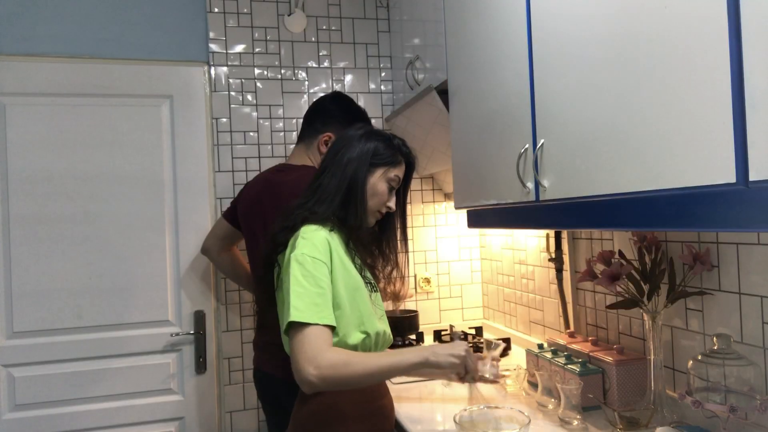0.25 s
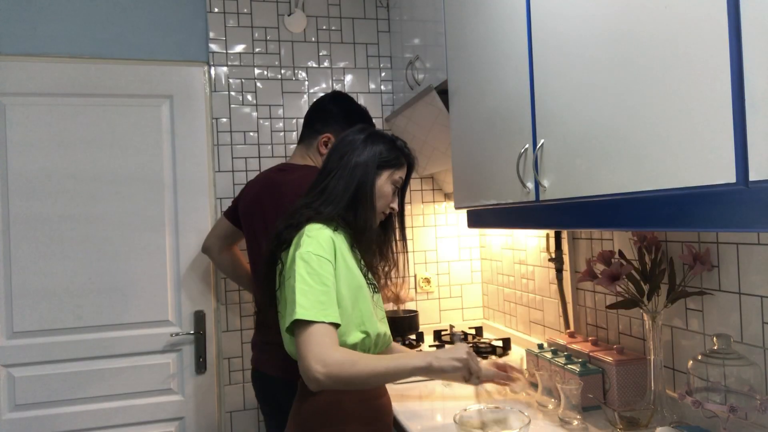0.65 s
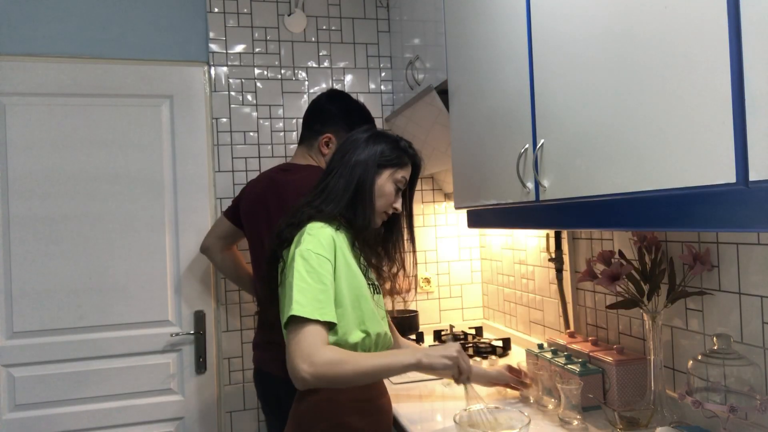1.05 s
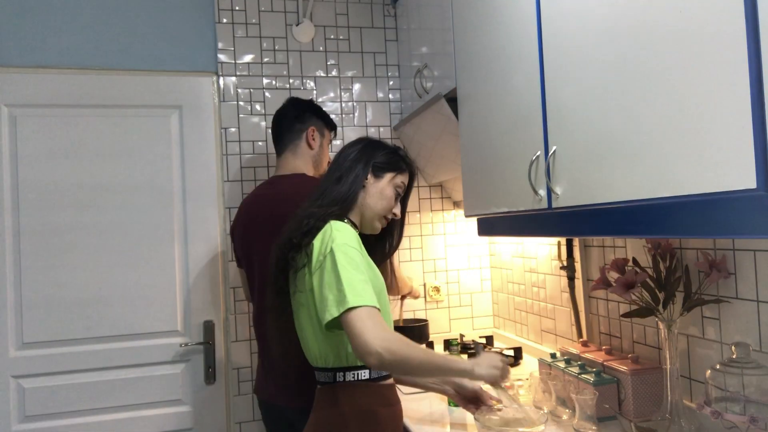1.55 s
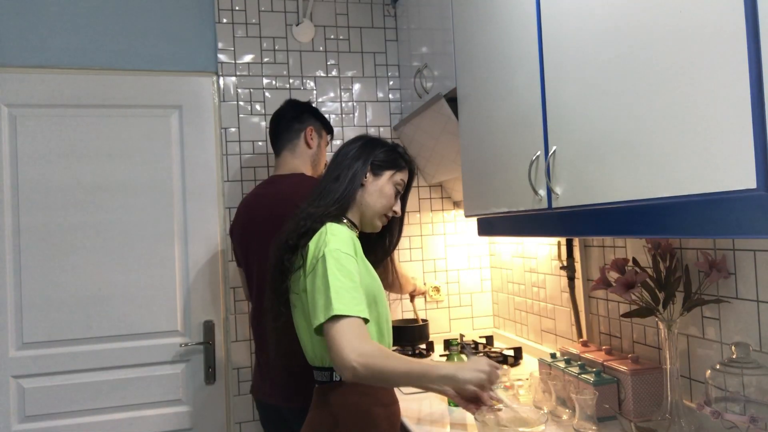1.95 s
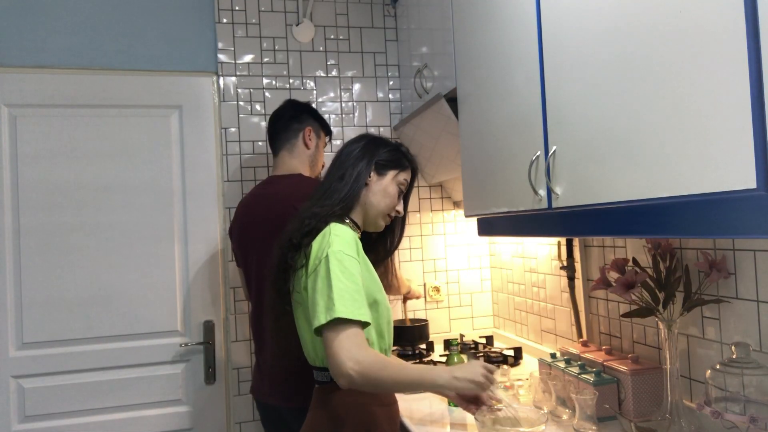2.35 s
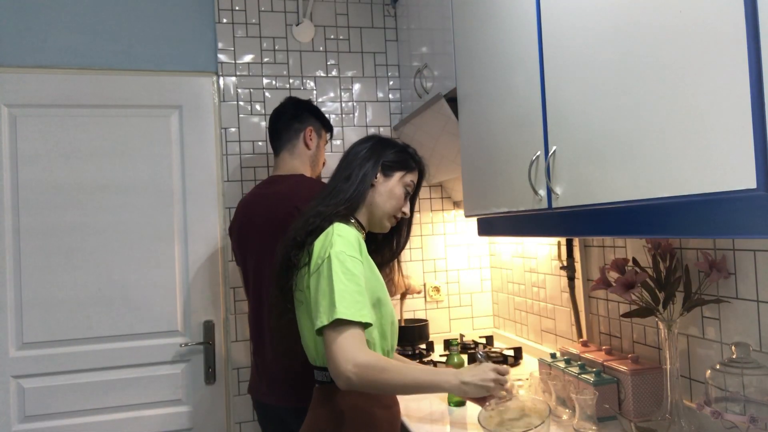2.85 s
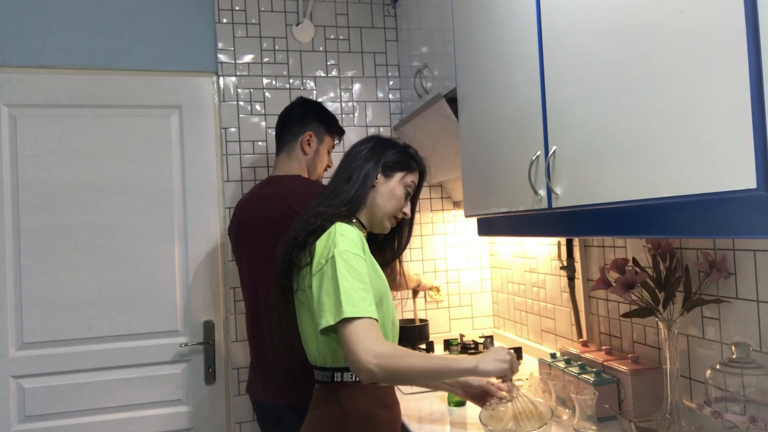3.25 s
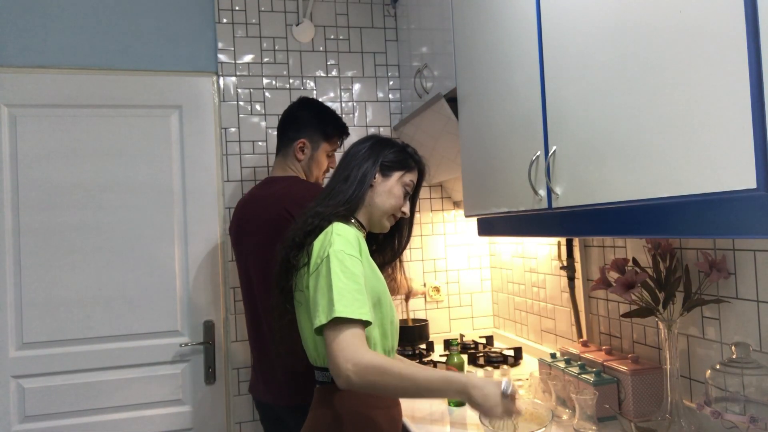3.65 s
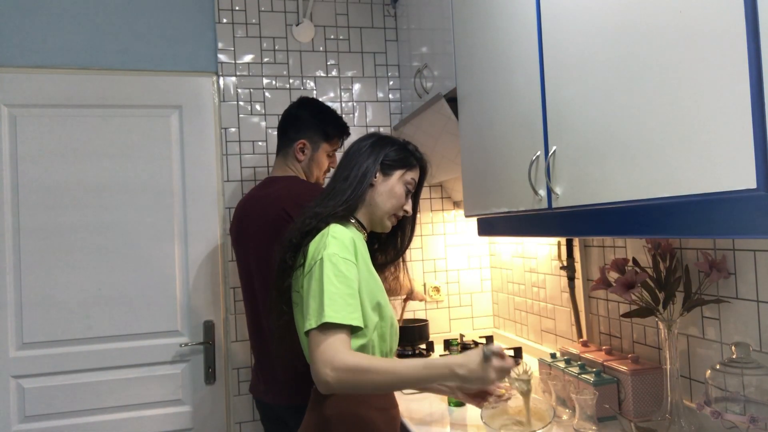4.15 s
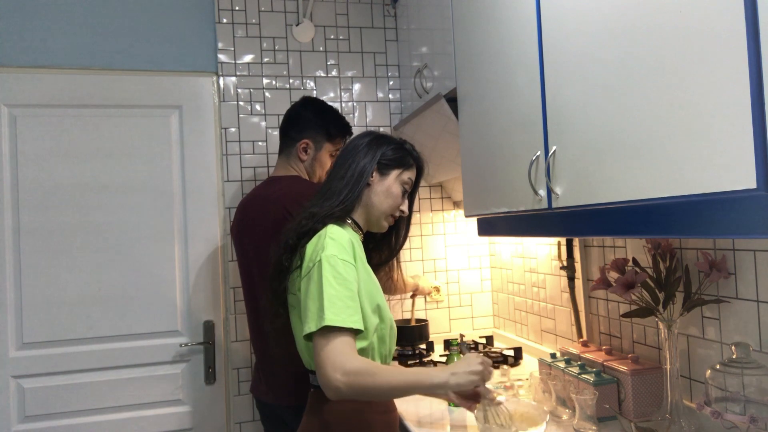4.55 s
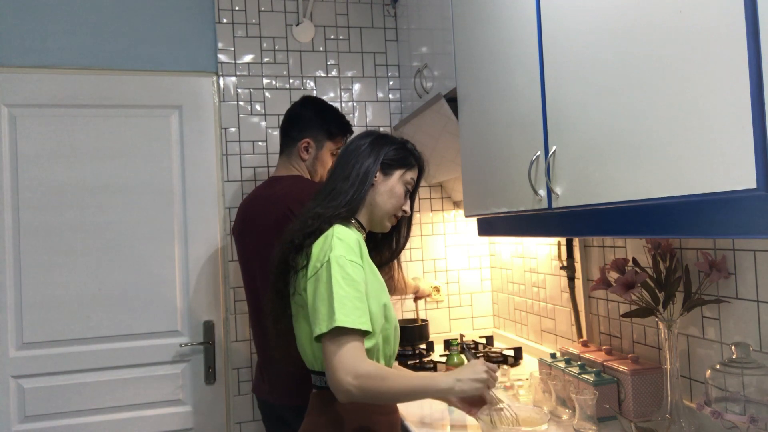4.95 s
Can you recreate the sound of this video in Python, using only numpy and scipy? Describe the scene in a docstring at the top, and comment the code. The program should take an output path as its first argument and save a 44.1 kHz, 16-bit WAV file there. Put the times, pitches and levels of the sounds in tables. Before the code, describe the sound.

A wire whisk clinks sharply on a glass bowl over thin hiss, then stirs softly over low hum before two loud bowl knocks.

```python
"""A wire whisk and a glass mixing bowl on the counter of a small tiled kitchen. Over a steady thin hiss
(coloured noise, narrow whistles) the whisk clinks hard, then lightly: noise cracks wake decaying modes. The
scene changes abruptly: now motor and mains hum sound with a rush of air. The whisk stirs softly: tiny random
slips drive resonances, among taps, scrapes, twangs and dull counter bumps. Two loud knocks of the bowl (thud,
clunk, ring) overload the microphone; a few faint touches follow."""
import sys
import numpy as np
from scipy import signal
from scipy.fft import rfft, irfft
from scipy.io import wavfile

SR = 44100
rng = np.random.default_rng(int(sys.argv[2]) if len(sys.argv) > 2 else 0)


def transcribe(signal):
    """Save signal, clipped to [-1, 1], as a 16-bit WAV file at the path in sys.argv[1]."""
    frames = np.atleast_2d(signal).T
    limited = np.clip(frames, -1, 1)
    pcm = np.round(limited * 32767).astype(np.int16)
    wavfile.write(sys.argv[1], SR, pcm)


N = 229356
TIME_S = np.arange(N) / SR
SECOND_S = TIME_S[:SR]   # time axis of every single event

# rel_db: level before the trims, filters and room of its source

# Room reverberation: pitch_hz, t60_s
ROOM_DECAY = [(100, 0.86), (350, 0.48), (1000, 0.31), (2500, 0.37), (5000, 0.31), (9000, 0.21),
              (16000, 0.27)]

# Broad hiss spectrum: pitch_hz, density_db_per_hz (relative)
HISS_SPECTRUM = [(25, -7), (60, 1), (150, -1.5), (400, -4), (750, -12), (1200, -1.5), (2200, -15.5),
                 (3000, -14), (4200, -7), (4850, -14.5), (7000, -17.5), (8200, -22), (10300, -22.5),
                 (12000, -15), (15500, -21.5)]
# Thin whistles in the hiss: pitch_hz, width_hz (of each of two stages), level_db_rms
HISS_WHISTLES = [(1094, 110, -64), (1187, 50, -64.5), (1260, 37, -65), (1420, 20, -64), (1530, 59, -64),
                 (1720, 38, -67.5), (3583, 59, -64), (3670, 39, -70), (4250, 190, -71), (5290, 114, -63.5),
                 (7020, 540, -69), (8600, 40, -84), (9460, 30, -77.5), (11650, 54, -74), (11440, 86, -68.5),
                 (11900, 100, -74), (15170, 380, -75)]
# Appliance air rush spectrum: pitch_hz, density_db_per_hz (relative)
AIR_SPECTRUM = [(15, -72), (25, -29), (97, -7.5), (149, -3.5), (354, -5), (659, -13), (962, -10),
                (1440, -13.5), (1700, -14.5), (2160, -25), (2690, -21.5), (5570, -24.5), (10700, -33.5),
                (12500, -29), (16000, -34)]
# Motor hum: multiple of turning rate, level_db_rms
MOTOR_HARMONICS = [(1, -61), (2, -53.5), (4, -70)]

# Dull bumps of the counter: start_s, rel_db, pitch_hz, t60_s
COUNTER_BUMPS = [(1.072, -33, 173, 0.061), (1.908, -35, 245, 0.063), (3.123, -32.5, 410, 0.075),
                 (3.13, -42, 190.5, 0.14), (3.149, -35.5, 52, .22), (4.619, -28, 42, 0.061)]

# Whisk strokes round the bowl: start_s, length_s, rub_rel_db, dry_hiss_rel_db
WHISK_STROKES = [(1.471, 0.11, -43.5, -60), (1.624, 0.041, -46.5, -69), (1.725, 0.11, -45.5, -64),
                 (1.898, 0.051, -49, -59), (2.12, 0.09, -44.5, -64), (2.228, 0.047, -45.5, -65),
                 (2.346, 0.072, -44, -70), (2.525, 0.031, -46.5, -68), (2.745, 0.043, -46, -68),
                 (3.2, 0.13, -48.5, -73), (3.353, 0.057, -50, -57), (3.513, 0.11, -45.5, -66),
                 (3.967, 0.17, -52, -81), (4.231, 0.073, -49, -72)]
# Wires tapping the glass: start_s, rel_db, corner_hz
WIRE_TAPS = [(1.738, -40, 2500), (1.909, -39.5, 2000), (2.53, -45, 3000), (2.708, -43.5, 3000),
             (3.121, -42, 1100), (4.046, -40, 4500), (5.155, -45.5, 3000)]
# Brief dry scrapes of the wires: start_s, rel_db, corner_hz
WIRE_SCRAPES = [(1.497, -43.5, 14000), (2.245, -48, 9000), (2.465, -52, 9000), (3.99, -48.5, 14000),
                (4.9, -47, 5000), (4.955, -44.5, 5990)]
# A single wire springing free: start_s, rel_db, corner_hz
WIRE_TWANGS = [(3.236, -40.5, 12000), (3.539, -43.5, 6000)]
# Modes of that wire: pitch_hz, rel_db, t60_s
WIRE_MODES = [(1670, -1, 0.11), (2347, 0, 0.13), (2400, -4, .15), (3930, 3, 0.069), (4310, 2, 0.082),
              (5680, 5, 0.062), (5760, -2, 0.076)]
# Spectrum of wires rubbing the bowl: pitch_hz, density_db_per_hz (relative)
RUB_SPECTRUM = [(150, -13), (300, -2), (450, -6), (640, -7.5), (920, -1), (1350, -6), (1750, -6.5),
                (2300, -12), (3700, -14), (4900, -23.5), (6000, -16), (10000, -29), (12500, -29),
                (16000, -36)]
# Resonances of rubbed bowl and wires: pitch_hz, width_hz, gain_db
RUB_RESONANCES = [(432, 72, 1), (871, 28, 2), (1002, 79, -3), (1688, 47, 0.5), (1910, 88, 0),
                  (2440, 63, -6.5), (2637, 80, 2.5), (3280, 62, -4.5), (3640, 95, -4), (4360, 210, -0.5),
                  (5490, 66, 4.5), (7430, 150, 1), (9200, 130, 1)]

# Whisk chattering on the rim: start_s, rel_db, corner_hz, ring_share_db
HARD_CLINKS = [(0.9075, -13, 9000, -25), (0.9102, -8, 7000, -19), (0.9135, -9, 8950, -23.5)]
# Ring of glass and wires: pitch_hz, rel_db, t60_s
CLINK_MODES = [(436, -8, 0.54), (682, -8, 0.4), (780, -17, 0.4), (915, -4, 0.39), (975, -4, 0.26),
               (1027, -6, 0.56), (1230, -4, 0.26), (1720, -18, 0.18), (1970, -10, 0.46), (2060, -17, 0.13),
               (2270, -33, 0.38), (2490, -14, 0.39), (2760, -17, 0.16), (3250, 7, 0.11), (3230, -17, 0.072),
               (3720, -9, 0.15), (4030, 0, 0.13), (4250, -5, 0.093), (4870, -8, 0.16), (4870, 9, 0.11),
               (5280, 11, .16), (6470, 0.5, 0.17), (13170, -21, 0.21), (13100, -8, 0.22), (13300, -9, 0.2)]
# Dense clash of the wires: pitch_hz, density_db_per_hz (relative)
CLASH_SPECTRUM = [(100, -24), (200, -14), (290, -17), (420, -9.5), (600, -7), (900, 0.5), (1350, -3),
                  (2600, -7.5), (4000, -4.5), (5400, -8.5), (7200, -14), (10000, -41), (12000, -27),
                  (16000, -27)]
# Resonances of the wire cage: pitch_hz, width_hz, gain_db
CAGE_RESONANCES = [(945, 51, -0.5), (1066, 49, -4), (1690, 60, -3), (1880, 31, 3.5), (2063, 69, 4),
                   (2420, 110, 6.5), (2770, 120, 4.5), (3180, 38, -10), (3460, 40, -7), (3600, 40, -15),
                   (3880, 110, -2.5), (5080, 93, -4), (5440, 40, -2), (7640, 51, -10), (13280, 120, 19.5)]
# Whisk settling lightly on the bowl: start_s, rel_db, corner_hz
LIGHT_CLINKS = [(1.2445, -33, 2180)]
# Modes woken by the light touch: pitch_hz, rel_db, t60_s
LIGHT_MODES = [(434, -5, 0.41), (786, -4, 0.19), (828, -4.5, 0.36), (1050, -5, 0.35), (1230, -4, 0.2),
               (1880, -5, 0.39), (2620, -5, .09), (3310, 9.5, 0.045), (3550, 7, 0.09), (5550, -1, 0.15)]

# Bowl knocked against the counter: start_s, rel_db, corner_hz, ring_share_db
BOWL_KNOCKS = [(4.6166, 1, 7200, -21), (4.6355, -14.5, 4000, -42), (4.6465, -26, 2600, -37),
               (4.663, -21, 3000, -37), (4.771, -4.5, 2300, -19.5)]
# Thud of bowl and counter: pitch_hz, density_db_per_hz (relative)
THUD_SPECTRUM = [(40, -39), (140, -10.5), (210, -15.5), (340, -6), (480, -4.5), (680, 1), (1000, 3.5),
                 (1350, 5.5), (2300, -2.5), (3300, -6), (4400, -16), (5800, -16.5), (9000, -24),
                 (16000, -30)]
# Ring of the standing bowl: pitch_hz, rel_db, t60_s
BOWL_MODES = [(343.3, -11, 0.58), (452, -5, 0.26), (700, -2.5, 0.22), (771, 2, 0.15), (857, -3, 0.26),
              (1150, -18, 0.21), (1025, 1, 0.22), (1210, -5, 0.4), (1215, -6.5, 0.4), (1304, 2, 0.35),
              (1465, -8, 0.45), (1394, 0, 0.25), (1630, -11, 0.36), (1740, -10, 0.47), (1766, 1, 0.41),
              (1807, 3.5, 0.29), (2042, -10, 0.7), (2423, -4, 0.4), (3127, -2, 0.21), (5660, -13, 0.36)]

CHANGE_S = 1.41   # hiss gives way to hum
RUMBLE_FROM_S, RUMBLE_DB, RUMBLE_BEFORE_DB = 0.8, -62, -70   # rises once the whisk is handled
RUMBLE_HZ, RUMBLE_WIDTH_HZ = 49.4, 37
MOTOR_HZ, MAINS_HUM_HZ, MAINS_DB = 49.17, 99.91, -59.5   # motor slips behind the mains: the hums beat
IN_STEP_S = 3.24   # a top of the beat
STROKE_ATTACK_S, STROKE_RELEASE_S = 0.011, 0.02   # the wires bite, then ease off
RUB_TRIM_DB, DRY_HISS_TRIM_DB = -4.5, -4   # how strongly a stroke drives bowl and wires
IDLE_DB, IDLE_WAVER_DB, IDLE_WAVER_PER_S = -58, 0.9, 8   # light contact between strokes
SLIPS_PER_S, GRIP_DB, GRIPS_PER_S = 6000, 2.5, 70   # wires catch and slip unevenly
TAP_TRIM_DB, SCRAPE_TRIM_DB, TWANG_TRIM_DB = 2.5, 5.5, -10.5
CLUNK_DB, CLUNK_HZ, CLUNK_T60_S = -3, 680, 0.034   # foot of the bowl, at every knock
CEILING, CUTOFF_HZ = 0.71, 15750   # full scale = 1


def from_db(db):
    """Decibels to gain."""
    return 10 ** (np.asarray(db) / 20)


def rms_one(x):
    """Scale to rms 1."""
    return x / np.sqrt(np.mean(x ** 2) + 1e-20)


def at_hz(points, hz):
    """Read a table along a log-frequency axis."""
    table_hz, value = np.transpose(points)
    return np.interp(np.log(np.maximum(hz, 1)), np.log(table_hz), value)


def colour(x, spectrum):
    """Causal (minimum-phase) filter with the given spectrum; white noise keeps its power."""
    size = 2 ** 13
    bins_hz = np.arange(size // 2 + 1) * SR / size
    gain = rms_one(from_db(at_hz(spectrum, bins_hz)))
    # folding the cepstrum onto positive time gives minimum phase
    cepstrum = irfft(np.log(gain))
    cepstrum[1:size // 2] *= 2
    cepstrum[size // 2 + 1:] = 0
    impulse = irfft(np.exp(rfft(cepstrum)))
    return signal.fftconvolve(x, impulse)[:len(x)]


def resonance(x, hz, width_hz):
    """Two-pole resonance with gain 1 on top."""
    r = np.exp(-np.pi * width_hz / SR)
    zeros = np.array([1, 0, -1]) * (1 - r * r) / 2
    poles = [1, -2 * r * np.cos(2 * np.pi * hz / SR), r * r]
    return signal.lfilter(zeros, poles, x)


def body(x, resonances, between_db):
    """A body passes its resonances strongly and little in between."""
    peaks = sum(from_db(db) * resonance(x, hz, width_hz) for hz, width_hz, db in resonances)
    return from_db(between_db) * x + peaks


def dying(t60_s):
    """One second of exponential decay, down 60 dB after t60_s."""
    return np.exp(-np.log(1000) * SECOND_S / t60_s)


def burst(t60_s):
    """Countless close modes dying together, as decaying noise."""
    return rng.standard_normal(SR) * dying(t60_s)


def ring(modes, scatter_db):
    """Distinct decaying modes, neighbours in opposite senses; each blow shares its force differently."""
    out = np.zeros(SR)
    for k, (hz, db, t60_s) in enumerate(modes):
        gain = (-1) ** k * from_db(db + scatter_db * rng.standard_normal())
        out += gain * dying(t60_s) * np.sin(2 * np.pi * hz * SECOND_S)
    return out


def swing(hz, t60_s, rise_s=0.005):
    """One dull, quickly damped mode under a soft contact."""
    return dying(t60_s) * np.sin(2 * np.pi * hz * SECOND_S) * np.minimum(SECOND_S / rise_s, 1)


def waver(per_s):
    """Random wander: per_s new values a second, joined by straight lines."""
    knots = rng.standard_normal(size=1024)
    return np.interp(TIME_S * per_s, np.arange(len(knots)), knots)


def add(track, start_s, sound):
    """Mix a sound in at a time."""
    start = max(int(start_s * SR), 0)
    track[start:start + len(sound)] += sound[:N - start]


def play(events, voice):
    """One fresh sound for each contact, dulled by a first-order low-pass at its corner."""
    out = np.zeros(N)
    for start_s, db, corner_hz, *details in events:
        b, a = signal.butter(1, min(corner_hz, SR / 2 - 1000), fs=SR)
        add(out, start_s, from_db(db) * signal.lfilter(b, a, voice(*details)))
    return out


def reflections(gap_s=0.0022, build_s=0.0067):
    """Dense reflections off the tiles: noise bands, each with its own decay; energy 1."""
    edges_hz = np.geomspace(40, 16000, 14)
    tail = np.zeros(SR)
    white = rng.standard_normal((2, SR))   # neighbouring bands use different noise
    for k, (low_hz, high_hz) in enumerate(zip(edges_hz, edges_hz[1:])):
        band_pass = signal.butter(2, [low_hz, high_hz], "band", fs=SR, output="sos")
        t60_s = at_hz(ROOM_DECAY, np.sqrt(low_hz * high_hz))
        tail += signal.sosfilt(band_pass, white[k % 2]) * dying(t60_s)
    tail *= np.clip((SECOND_S - gap_s) / build_s, 0, 1)
    return tail / np.linalg.norm(tail)


def kitchen(x, wet_db):
    """Direct sound plus the room."""
    return x + from_db(wet_db) * signal.fftconvolve(x, reflections())[:N]


def blow(spectrum, t60_s, wet_db):
    """A short crack of countless close modes plus its wash in the room."""
    crack = burst(t60_s)
    wash = from_db(wet_db) * np.linalg.norm(crack) * reflections()
    return colour(crack + wash, spectrum)


def rumble():
    """The lowest resonance of the room, stirred by movement: noise through two resonant stages."""
    drive = from_db(np.where(TIME_S < RUMBLE_FROM_S, RUMBLE_BEFORE_DB, RUMBLE_DB))
    low = resonance(drive * rng.standard_normal(N), RUMBLE_HZ, RUMBLE_WIDTH_HZ)
    low = resonance(low, RUMBLE_HZ, RUMBLE_WIDTH_HZ)
    return np.sqrt(np.mean(drive ** 2)) * rms_one(low)


def hiss():
    """A thin hiss of coloured noise with narrow, half-whistling resonances."""
    out = from_db(-53.5) * colour(rng.standard_normal(N), HISS_SPECTRUM)
    for hz, width_hz, db in HISS_WHISTLES:
        whistle = resonance(rng.standard_normal(N), hz, width_hz)
        whistle = resonance(whistle, hz, width_hz)
        out += from_db(db) * rms_one(whistle)
    return out


def appliance():
    """A motor hums and beats slowly against the mains hum, over a soft rush of air."""
    tones = [(k * MOTOR_HZ, db) for k, db in MOTOR_HARMONICS] + [(MAINS_HUM_HZ, MAINS_DB)]
    hum = sum(from_db(db) * np.sqrt(2) * np.sin(2 * np.pi * hz * (TIME_S - IN_STEP_S))
              for hz, db in tones)
    air = from_db(-52.0) * colour(rng.standard_normal(N), AIR_SPECTRUM)
    return hum + air


def bumps():
    """Dull, quickly damped swings of the counter."""
    out = np.zeros(N)
    for start_s, db, hz, t60_s in COUNTER_BUMPS:
        add(out, start_s, from_db(db) * swing(hz, t60_s))
    return kitchen(out, wet_db=-6.0)


def stroke(start_s, length_s):
    """Pressure of one stroke: attack, hold, release."""
    attack = np.clip((TIME_S - start_s) / STROKE_ATTACK_S, 0, 1)
    release = np.exp(-np.maximum(TIME_S - start_s - length_s, 0) / STROKE_RELEASE_S)
    return attack * release


def stirring():
    """Wires slip over the glass in tiny random jerks, harder in strokes; they tap, scrape, spring free."""
    slips = rms_one(rng.standard_normal(N) * (rng.random(N) < SLIPS_PER_S / SR))
    slips = slips * rms_one(from_db(GRIP_DB * waver(GRIPS_PER_S)))
    in_contact = (TIME_S > CHANGE_S) * (TIME_S < BOWL_KNOCKS[0][0])   # until the first knock
    idle = from_db(IDLE_DB + IDLE_WAVER_DB * waver(IDLE_WAVER_PER_S)) * in_contact
    pressure, dry_pressure = np.zeros(N), np.zeros(N)
    for start_s, length_s, rub_db, dry_db in WHISK_STROKES:
        shape = stroke(start_s, length_s)
        pressure += from_db(rub_db + RUB_TRIM_DB) * shape
        dry_pressure += from_db(dry_db + DRY_HISS_TRIM_DB) * shape
    rubbing = slips * np.hypot(idle, pressure)
    dry_hiss = slips * dry_pressure
    taps = from_db(TAP_TRIM_DB) * play(WIRE_TAPS, lambda: burst(t60_s=0.064))
    scrapes = from_db(SCRAPE_TRIM_DB) * play(
        WIRE_SCRAPES, lambda: burst(t60_s=0.056) * np.minimum(SECOND_S / 0.0042, 1))   # 4.2 ms rise
    twangs = from_db(TWANG_TRIM_DB) * play(WIRE_TWANGS, lambda: ring(WIRE_MODES, scatter_db=1))
    bowl = body(colour(rubbing + taps, RUB_SPECTRUM), RUB_RESONANCES, between_db=-2.0)
    return kitchen(bowl + dry_hiss + scrapes + twangs, wet_db=-4.0)


def clinks():
    """The wires clash on the rim and leave the glass ringing, then settle lightly."""
    def hard(ring_db):
        clash = blow(CLASH_SPECTRUM, t60_s=0.017, wet_db=-1.5)
        caged = body(clash, CAGE_RESONANCES, between_db=-1.5)
        return caged + from_db(ring_db) * ring(CLINK_MODES, scatter_db=0.7)

    def light():
        clash = blow(CLASH_SPECTRUM, t60_s=0.041, wet_db=5.0)
        return clash + from_db(-3.5) * ring(LIGHT_MODES, scatter_db=0.8)

    return play(HARD_CLINKS, hard) + play(LIGHT_CLINKS, light)


def knocks():
    """Heavy blows: the counter thuds, the bowl clunks, rattles and rings."""
    def thud_and_ring(ring_db):
        thud = blow(THUD_SPECTRUM, t60_s=0.059, wet_db=-2)
        return thud + from_db(ring_db) * ring(BOWL_MODES, scatter_db=2.5)

    clunks = play([row[:3] for row in BOWL_KNOCKS],
                  lambda: from_db(CLUNK_DB) * swing(CLUNK_HZ, CLUNK_T60_S))
    return kitchen(clunks, wet_db=-12.0) + play(BOWL_KNOCKS, thud_and_ring)


def scene():
    """Whisk and bowl over the background of the kitchen."""
    background = rumble() + np.where(TIME_S < CHANGE_S, hiss(), appliance())
    return (background + bumps() + stirring() + clinks() + knocks())[None]


def record(dry):
    """The microphone flattens the loudest peaks; a steep low-pass cuts the top."""
    flattened = dry / (1 + (dry / CEILING) ** 8) ** (1 / 8)
    low_pass = signal.ellip(10, 0.1, 80, CUTOFF_HZ, fs=SR, output="sos")
    return signal.sosfilt(low_pass, flattened)


dry = scene()
out = record(dry)
transcribe(out)
```